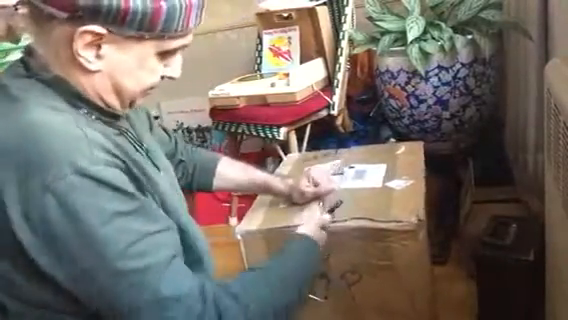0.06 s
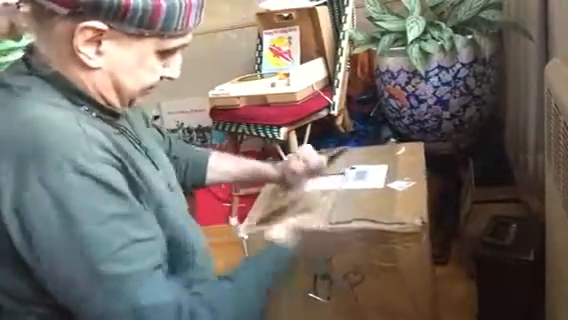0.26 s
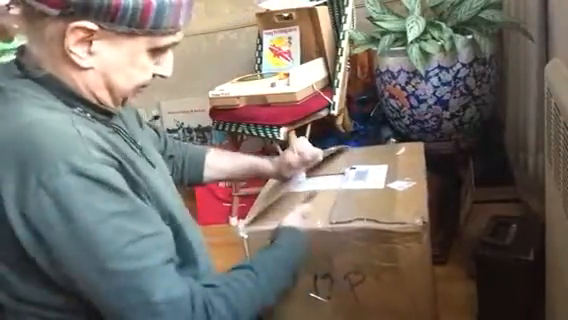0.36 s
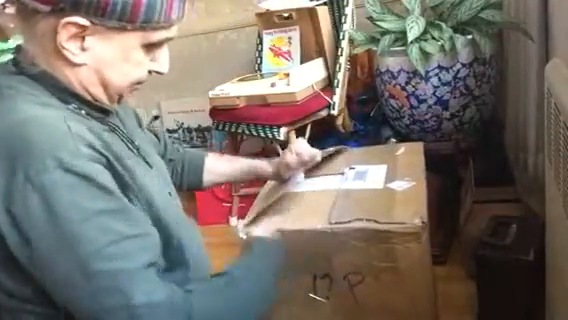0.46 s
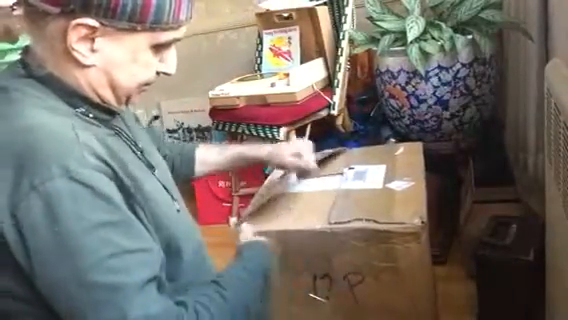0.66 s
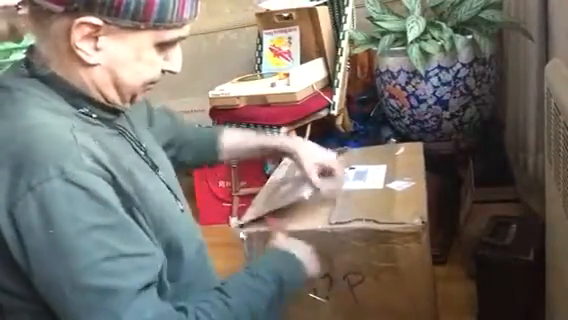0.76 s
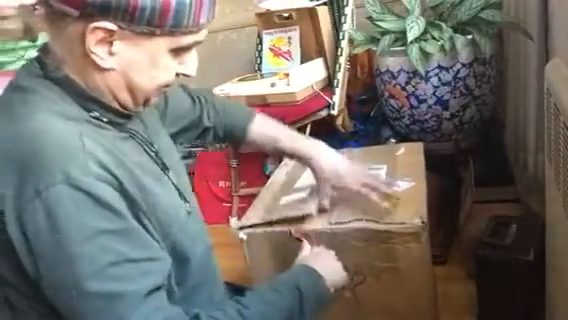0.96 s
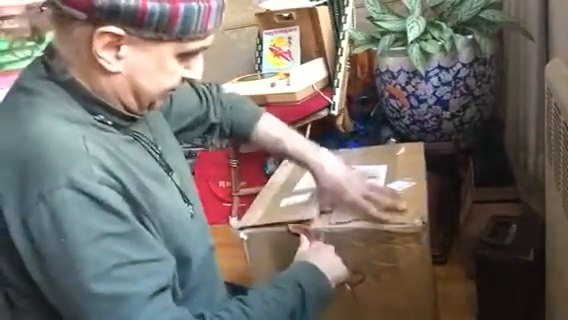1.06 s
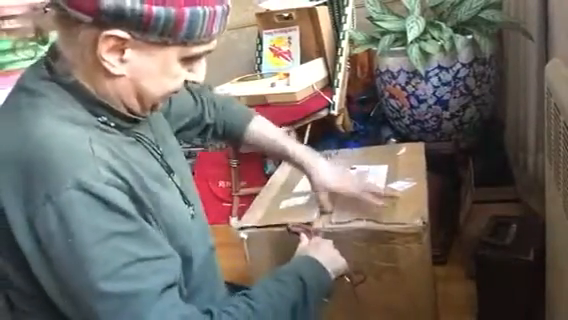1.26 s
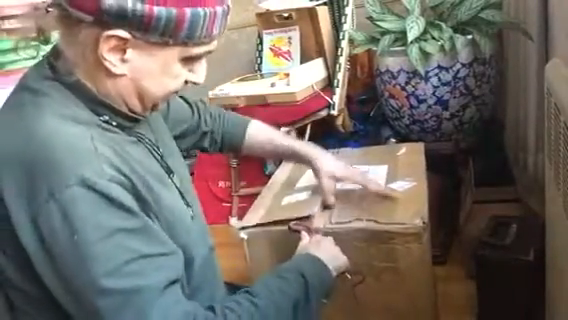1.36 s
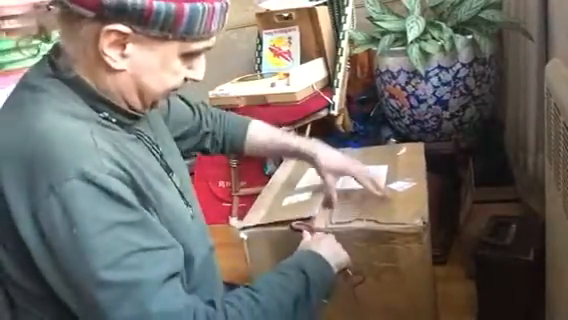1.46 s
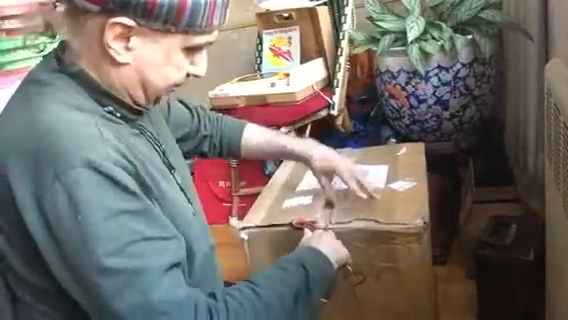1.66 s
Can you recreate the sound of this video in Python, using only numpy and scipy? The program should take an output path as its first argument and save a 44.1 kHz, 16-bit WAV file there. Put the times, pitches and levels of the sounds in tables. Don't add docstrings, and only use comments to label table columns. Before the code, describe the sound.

Tape ripping from a cardboard box, one loud crack, then scattered crackles and soft flap knocks.

```python
import sys
import numpy as np
from scipy import signal
from scipy.fft import rfft, irfft
from scipy.io import wavfile
from scipy.ndimage import uniform_filter1d

SR = 44100
rng = np.random.default_rng(int(sys.argv[2]) if len(sys.argv) > 2 else 0)


def digitize_waveform(pressure):
    field = np.atleast_2d(pressure).T
    bounded = np.clip(field, -1, 1)
    quanta = np.round(bounded * 32767).astype(np.int16)
    wavfile.write(sys.argv[1], SR, quanta)


def invert_db(level):
    return 10 ** (np.asarray(level, dtype=float) / 20)


N = 74970

# f/Hz, level/dB
CRACKLE_SPECTRUM = [(590, -16), (1000, 0), (2170, -1.5), (2630, 3), (3500, -3), (8000, -13), (10400, -16.5),
                    (17600, -120)]
# f/Hz, level/dB
FIZZ_SPECTRUM = [(3820, -6), (6500, 1), (7420, 2), (8210, -5.5), (10500, -3.5), (12300, -0.5), (16000, -14)]
# f/Hz, level/dB
DRAG_SPECTRUM = [(110, 13.5), (180, 7.5), (361, 1.5), (618, 9), (1600, -12.5), (2080, -25), (3520, -120)]


def evened(x):
    return x / np.sqrt(np.mean(x ** 2) + 1e-20)


def read(points, hz):
    f, value = np.transpose(points)
    return np.interp(np.log(hz + 1), np.log(f + 1), value)


def add(mix, s, sound):
    part = mix[max(round(s * SR), 0):][:len(sound)]
    part += sound[:len(part)]


def colour(x, points):
    hz = np.fft.rfftfreq(len(x), 1 / SR)
    shut = [(points[0][0] / 2, -60)] + list(points) + [(points[-1][0] * 2, -60)]
    return evened(irfft(rfft(x) * invert_db(read(shut, hz)), len(x)))


def resonate(x, hz, width):
    r = np.exp(-np.pi * width / SR)
    return 2 * signal.lfilter([1 - r], [1, -r * np.exp(2j * np.pi * hz / SR)], x).real


def wavering(spread_db, samples):
    return invert_db(spread_db * evened(uniform_filter1d(rng.standard_normal(N), size=samples)))


def floor():
    # f/Hz, level/dB
    tone_spectrum = [(15, -41), (25, -14), (146, 1), (483, -18), (568, -17.5), (1930, -24.5), (3510, -25.5),
                     (14400, -38), (16500, -59)]
    tone_db, hum_db = -62, -74
    hum_hz, hum_width_hz = 118, 105
    hum = resonate(rng.standard_normal(N), hum_hz, hum_width_hz)
    hum = evened(resonate(hum, hum_hz, hum_width_hz))
    return invert_db(tone_db) * colour(rng.standard_normal(N), tone_spectrum) + invert_db(hum_db) * hum


def ping(peak_db, hz):
    t = np.arange(1200) / SR
    t60_s = 0.0044 + 24 / hz
    pair = np.sin(2 * np.pi * hz * t) + 0.24 * np.sin(2 * np.pi * 0.93 * hz * t)
    return invert_db(peak_db - 4.5 - 60 * t / t60_s) * np.minimum(t / 0.00033, 1) * pair


def boom(peak_db, hz, hold):
    t = np.arange(9000) / SR
    swell = np.sin(np.pi / 2 * np.minimum(t / 0.0091, 1)) ** 2
    decay = invert_db(-60 * np.maximum(t - .011 - hold, 0) / 0.059)
    tone = np.sin(2 * np.pi * hz * t)
    tone += 0.11 * np.sin(2 * np.pi * 2.3 * hz * t)
    tone += 0.34 * np.sin(2 * np.pi * .7 * hz * t)
    return invert_db(peak_db - 1.5) * swell * decay * tone


def knock(peak_db, hz):
    t60_s, attack_s = 0.034, .0012
    t = np.arange(3000) / SR
    modes = np.sin(2 * np.pi * hz * t)
    modes += 0.14 * np.sin(2 * np.pi * hz * 1.096 * t)
    modes += 0.23 * np.sin(2 * np.pi * hz * 0.89 * t)
    return invert_db(peak_db - 6.5 - 60 * t / t60_s) * np.minimum(t / attack_s, 1) * modes


def snap(peak_db, hz, bright_db):
    # f/Hz, width/Hz, level/dB
    card_modes = [(1231, 235, 3.5), (1737, 183, -3), (2600, 320, -2.5), (3550, 740, 6.5), (4600, 1800, 1),
                  (6410, 1600, 1)]
    tilt = 0.17
    t = np.arange(1600) / SR
    noise = rng.standard_normal((2, 1600))
    grip_db = 3.5 * noise[1, -len(card_modes):]
    slip = invert_db(-60 * t / .004) * np.minimum(t / .0003, 1)
    burst = noise[0] * (slip + invert_db(-11 - 60 * t / 0.04))
    burst[9] += 7
    tape = resonate(resonate(burst, hz, 0.23 * hz), hz, 0.23 * hz) / np.sqrt(0.071 * hz)
    card = 0
    for k, (f, w, db) in enumerate(card_modes):
        mode_db = db + 1.0 + grip_db[k] + tilt * (bright_db + 13.5) * np.log2(f / 2000)
        mode = resonate(resonate(burst, f, w), f, 2.07 * w) / np.sqrt(w)
        card = card + (-1) ** k * invert_db(mode_db) * mode
    body = tape + invert_db(-6.0 - 19.3 * abs(np.log2(hz / 2400))) * card
    air = colour(noise[1], FIZZ_SPECTRUM) * (slip + invert_db(-29.5 - 60 * t / 0.098))
    return invert_db(peak_db) * (body / abs(body).max() + invert_db(bright_db + 8) * air)


def stroke(start, length, level_db):
    grip_s, let_go_t60_s = .0025, 0.061
    linger_db, linger_t60_s = -12.5, 0.25
    t = np.arange(N) / SR - start
    after = np.maximum(t - length, 0)
    fade = np.maximum(invert_db(-60 * after / let_go_t60_s), invert_db(linger_db - 60 * after / linger_t60_s))
    return invert_db(level_db) * fade * np.clip(t / grip_s, 0, 1)


def sing(x, hz, width):
    drift = 1 + 0.029 * evened(uniform_filter1d(rng.standard_normal(N), size=700))
    turn = np.exp(2j * np.pi * np.cumsum(hz * drift) / SR)
    r = np.exp(-np.pi * width / SR)
    return evened((turn * signal.lfilter([1], [1, -2 * r, r * r], x / turn)).real)


def scuff(rows, ridges):
    rub = rng.standard_normal(N) * wavering(2.3, 300)
    bands = [(hz, invert_db(db) * wavering(1.4, 900) * sing(rub, hz, w)) for hz, w, db in ridges]
    loose = colour(rub, CRACKLE_SPECTRUM) + invert_db(3.0) * colour(rub, DRAG_SPECTRUM)
    out = np.zeros(N)
    for s, length, db, tilt_db, loose_db in rows:
        singing = sum(invert_db(tilt_db * np.log2(hz / 3000)) * band for hz, band in bands) / 2
        out += stroke(s, length, db) * (singing + invert_db(loose_db - 9) * loose)
    return out


def peel():
    # t/s, length/s, pull level/dB, brightness/dB, drag on the flap/dB
    pulls = [(0.17, 0.038, -54.5, -17, 1), (0.2042, 0.01, -45, -2.5, -0.5), (0.22, 0.03, -40, -5.5, 0),
             (0.248, 0.0098, -31.5, -4, -7), (0.265, 0.039, -45.5, -14, -9.5),
             (0.313, 0.036, -46.5, 0.5, -5.5), (0.352, 0.028, -48.5, -12.5, -6),
             (0.389, 0.026, -57.5, -21, -15), (0.517, 0.049, -48, -1, -1), (0.557, 0.052, -50, 1.5, -1.5),
             (0.614, 0.055, -55, -40, -3.5), (0.665, 0.012, -59, 2.5, -14), (0.738, 0.035, -54, -14, -0.5),
             (0.775, 0.033, -57.5, 0.5, -12), (0.818, 0.062, -66, -3, -1), (0.905, 0.036, -56.5, -37, -5),
             (0.956, 0.039, -65, -27, 6), (1.247, 0.015, -76, 1, 4), (1.328, 0.061, -63.5, -33, -6),
             (1.42, 0.027, -61, -19, -9)]
    ticks_per_s, tick_spread_db = 600, 1.5
    drive = rng.standard_normal(N)
    for hz in np.geomspace(250, 15500, num=20):
        heights = invert_db(tick_spread_db * np.minimum(rng.exponential(1, N), 3))
        ticks = heights * (rng.random(N) < ticks_per_s / SR) * rng.standard_normal(N)
        drive += evened(resonate(ticks, hz, 0.21 * hz)) * np.sqrt(hz / 40000)
    drive *= wavering(2.2, 160)
    crackle = colour(drive, CRACKLE_SPECTRUM)
    fizz = colour(drive, FIZZ_SPECTRUM)
    drag = colour(drive, DRAG_SPECTRUM)
    return sum(stroke(s, length, db) * (crackle + invert_db(bright_db) * fizz + invert_db(drag_db) * drag)
               for s, length, db, bright_db, drag_db in pulls)


def puffs():
    # t/s, level/dB, f/Hz
    pushes = [
        (0.31, -48, 48),
        (0.408, -53, 52.3),
        (0.643, -51, 66),
        (.95, -71, 41.67),
    ]
    width_s = 0.019
    t = np.arange(N) / SR
    return sum(invert_db(db) * np.exp(-((t - s) / width_s) ** 2) * np.sin(2 * np.pi * hz * (t - s))
               for s, db, hz in pushes)


def room(x):
    # f/Hz, t60/s
    decay = [(150, 0.034), (700, 0.23), (3000, 0.21), (9000, 0.12), (15000, 0.3)]
    taps = np.zeros(16000)
    at = np.arange(80, 15900, 20)
    taps[at + rng.integers(0, 20, len(at))] = rng.choice([-1., 1.], len(at))
    hz, t, z = signal.stft(taps, SR, nperseg=256)
    t60_s = np.maximum(read(decay, hz), .02)[:, None]
    tail = signal.istft(z * invert_db(-60 * t / t60_s), SR, nperseg=256)[1]
    return signal.fftconvolve(x, tail / np.linalg.norm(tail))[:N]


def scene():
    # t/s, peak level/dB, ring f/Hz
    threads = [(.0100, -40, 8900), (.0102, -46, 13000), (.0102, -40, 6050), (.0137, -33, 3490),
               (.070, -44, 2620), (.091, -47, 2700), (.175, -44, 3530), (.185, -41.5, 2430),
               (.186, -50, 12000), (.2222, -28, 1560), (.2225, -42, 7600), (.2492, -10, 2526),
               (.2492, -14, 4600), (.2494, -20.5, 1252), (.2495, -18, 7000), (.256, -31, 7250),
               (.3142, -24, 7300), (.3155, -27, 3070), (.326, -25.5, 4940), (.341, -28, 7150),
               (.5105, -48, 6500), (.5195, -35, 2370), (.528, -28.5, 2760), (.540, -29, 7500),
               (.5603, -31, 5240), (.567, -29, 2700), (.567, -31, 7200), (.5815, -38, 11300),
               (.5815, -28, 8800), (.603, -40, 1430), (.608, -38, 6500), (.6695, -29.5, 6250),
               (.6838, -35, 7200), (.7425, -36, 2240), (.765, -38, 2400), (.807, -39, 3780),
               (.828, -39.5, 1200), (.8285, -34, 5900), (.855, -49, 3300), (.899, -52, 6660),
               (.908, -49, 1010), (.921, -54, 3400), (.970, -61, 8800), (.978, -61, 6300),
               (.978, -64, 4420), (1.097, -58, 3200), (1.334, -38.5, 1890), (1.334, -30.5, 3600),
               (1.334, -38, 6230), (1.334, -29, 10900), (1.198, -51, 3470), (1.257, -61, 1500),
               (1.4985, -44, 3600), (1.62, -36.5, 3420), (1.62, -52, 3860), (1.628, -46, 2600)]
    # t/s, peak level/dB, f/Hz, hold/s
    box_booms = [(.015, -51, 114, 0.0062), (.087, -44, 118, 0.0018), (.128, -49.5, 133, 0.0096),
                 (.239, -34, 147.3, 0.029), (.288, -41.5, 118, 0.015), (.367, -42, 117, 0.017),
                 (.429, -46.5, 121, 0.0043), (.524, -39, 134, 0.071), (.646, -51.5, 137, 0.021),
                 (.792, -48.5, 132.3, 0.014), (.918, -44.5, 127, 0.023), (.977, -32.5, 130.3, 0.0062),
                 (1.005, -45, 128, 0.029), (1.057, -47.5, 134, 0.024), (1.099, -53, 109, 0.022),
                 (1.262, -42, 126.5, 0.0048), (1.289, -46.5, 132, 0.0021), (1.35, -52.5, 148, 0.018),
                 (1.437, -52, 137, 0.01), (1.595, -57, 148.4, 0.011)]
    # t/s, peak level/dB, ring f/Hz
    flap_knocks = [(0.013, -42.5, 622), (0.784, -40.5, 584), (0.259, -25, 387), (0.219, -17, 725),
                   (0.222, -20.5, 677), (0.229, -25, 656), (0.237, -22.5, 695), (0.248, -18, 678),
                   (0.519, -23.5, 702), (0.5189, -25.5, 930), (0.7425, -29, 675), (0.748, -28, 574),
                   (0.832, -43, 676), (0.92, -37, 685), (0.971, -36.5, 726), (1.044, -38.5, 777),
                   (1.08, -42.5, 430), (1.257, -47.5, 505), (1.3337, -32, 1290), (1.336, -35, 654),
                   (1.431, -42.5, 672), (1.4419, -39.5, 1263), (1.589, -50, 1280)]
    # t/s, peak level/dB, ring f/Hz, brightness/dB
    glue_snaps = [(0.0129, -35, 2390, -14.5), (0.1325, -49.5, 5650, -16), (0.2152, -27, 2300, -14),
                  (0.2487, -22, 2510, -17), (0.329, -36.5, 2770, 8), (0.56, -38.5, 3060, -5),
                  (0.607, -33, 2560, -25), (0.669, -33.5, 2120, -22), (0.7415, -38, 2640, -7.5),
                  (0.749, -33, 2140, -5.5), (0.7804, -30, 3550, -11.5), (0.82, -46, 3240, -19),
                  (0.827, -36, 3030, -11), (0.852, -44, 3400, -23), (0.9207, -28, 2260, -45),
                  (0.97, -50.5, 2580, -14), (1.1907, -56, 3240, -10), (1.3335, -28.5, 2650, -11),
                  (1.3996, -40, 3400, -10), (1.4287, -44, 2300, -17), (1.436, -43.5, 6300, -12),
                  (1.4417, -42.5, 3390, -7), (1.498, -50.5, 3450, -26), (1.59, -49.5, 2600, -29),
                  (1.6193, -42, 3860, -13)]
    # t/s, length/s, level/dB, tilt/(dB per octave), loose rustle/dB
    finger_rubs = [
        (0.03, 0.077, -59.5, 1.5, 4.5),
        (0.136, 0.039, -60, -6, -2),
    ]
    # f/Hz, width/Hz, level/dB
    card_ridges = [(756, 90, -14), (1242, 100, -17), (2590, 160, -11), (3250, 200, -11), (5150, 400, -4.5),
                   (5900, 740, -3), (7600, 4500, -9), (11800, 2000, -19)]
    # t/s, length/s, level/dB, tilt/(dB per octave), loose rustle/dB
    hand_slides = [
        (1.026, 0.032, -52.5, -2.5, -2),
    ]
    # f/Hz, width/Hz, level/dB
    lid_ridges = [(755, 124, -4.5), (1260, 92, -9.5), (2390, 400, -10.5), (3220, 220, -9), (6500, 830, -6),
                  (7200, 1100, -6), (8800, 1300, -6.5), (12200, 2500, -6)]
    room_db = -9.5

    near = scuff(finger_rubs, card_ridges) + peel() + scuff(hand_slides, lid_ridges)
    low = puffs()
    for s, *row in threads:
        add(near, s, ping(*row))
    for s, *row in box_booms:
        add(low, s - .005, boom(*row))
    for s, *row in flap_knocks:
        add(near, s, knock(*row))
    for s, *row in glue_snaps:
        add(near, s + .0006, snap(*row))
    return (near + invert_db(room_db) * room(near) + low + floor())[None]


def roll_off(x):
    return signal.sosfilt(signal.butter(12, 16800, fs=SR, output="sos"), x)


def record(dry):
    x = signal.sosfilt(signal.butter(3, 36, "high", fs=SR, output="sos"), dry)
    x = x - 0.5 * resonate(x, hz=10400, width=900)
    band_limit = signal.firwin(255, 16300, window=("kaiser", 8), fs=SR)
    x = signal.oaconvolve(x, band_limit[None], "same")
    return roll_off(x)


dry = scene()
out = record(dry)
digitize_waveform(out)
```